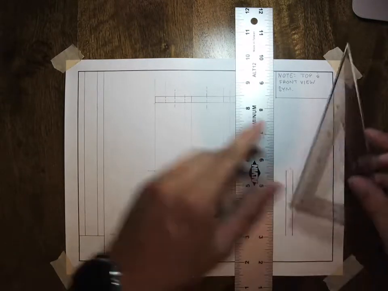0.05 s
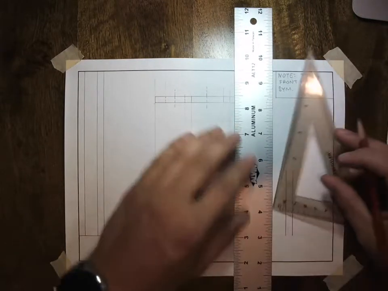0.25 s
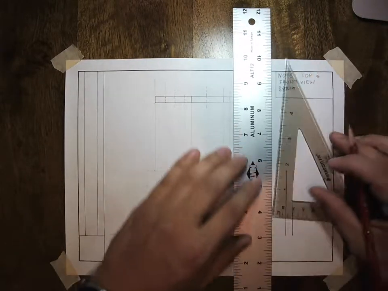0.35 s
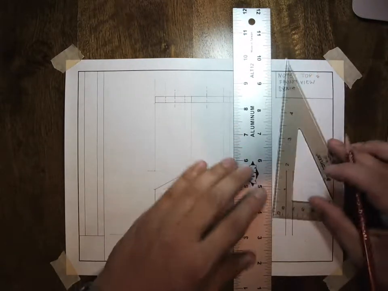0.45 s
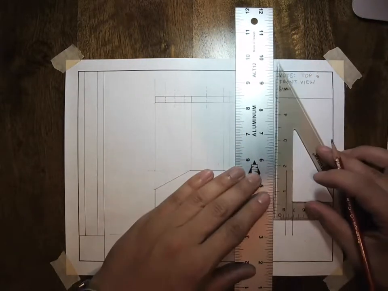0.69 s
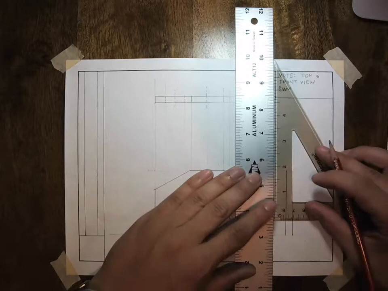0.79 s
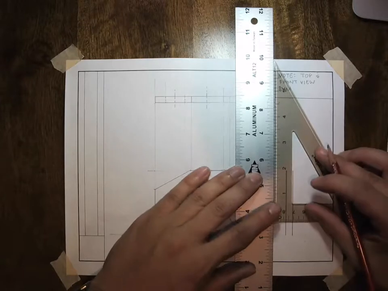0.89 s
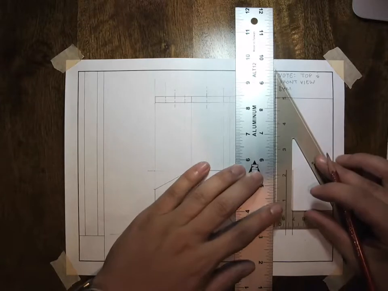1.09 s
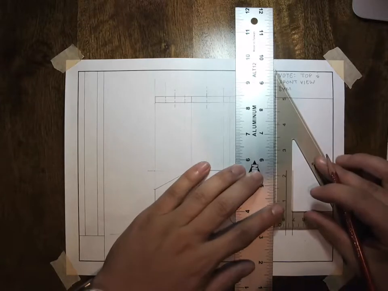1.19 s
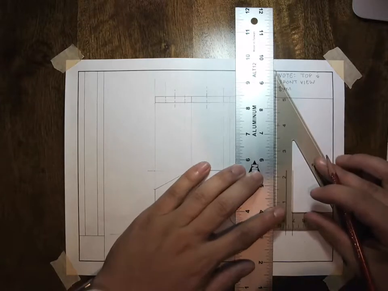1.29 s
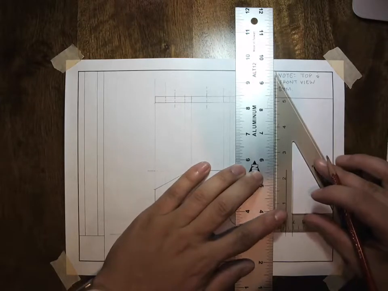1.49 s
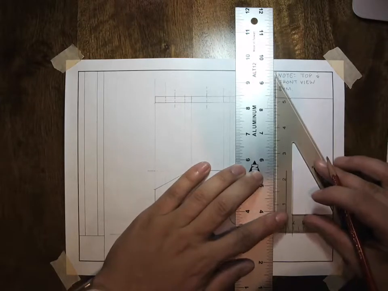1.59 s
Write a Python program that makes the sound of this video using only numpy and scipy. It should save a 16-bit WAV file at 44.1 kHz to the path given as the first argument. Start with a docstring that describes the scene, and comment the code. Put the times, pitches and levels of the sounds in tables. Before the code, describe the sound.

A plastic set square clicks and slaps down on paper, then taps a metal ruler

```python
"""A plastic set square is laid on paper on a wooden desk in a small room, over fan hiss, hum and whine.
Two faint finger squeaks (windowed sines) come first; then a corner ticks, an edge knocks, the square
slaps flat and is pushed against a metal ruler. Each contact is a short push with chatter that rings
decaying sine modes; a near surface echoes it and a diffuse tail of noise bands follows.
The fan, throughout, is flickering noise bands plus thin wavering tones."""
import sys
import numpy as np
from scipy import signal
from scipy.fft import rfft, irfft
from scipy.io import wavfile
from scipy.ndimage import uniform_filter1d

SR = 44100
rng = np.random.default_rng(int(sys.argv[2]) if len(sys.argv) > 2 else 0)


def to_wav(sig):
    """Store sig (one row per channel, or 1-D mono) as 16-bit WAV at the path in sys.argv[1].

    Samples outside -1..1 are clipped; the rate is SR.
    """
    pcm = np.clip(np.atleast_2d(sig), -1, 1) * 32767
    pcm = np.round(pcm).astype(np.int16)
    wavfile.write(sys.argv[1], SR, pcm.T)  # frames by channels


N = 72765
T = np.arange(N) / SR
SHORT_SAMPLES, LONG_SAMPLES = 1024, 16384  # one contact; one ring or room tail


def gain(db):
    """Amplitude factor for a level in dB."""
    return 10 ** (np.asarray(db) / 20)


def curve(rows):
    """Straight-line interpolation of (seconds, value) rows over the scene."""
    seconds, values = np.array(rows).T
    return np.interp(T, seconds, values)


def unit_rms(x):
    """Scale to RMS 1."""
    return x / np.sqrt(np.mean(x ** 2))


def wander(rate_hz):
    """Smooth random wander of RMS 1: white noise averaged twice over 1 / rate_hz."""
    width = int(SR / rate_hz)
    once = uniform_filter1d(rng.standard_normal(N), width)
    return unit_rms(uniform_filter1d(once, width))


def noise_bands(centres_hz, size):
    """Split white noise into overlapping bands, triangular in log frequency."""
    log_hz = np.log(np.maximum(np.arange(size // 2 + 1) * SR / size, 1))
    log_centres = np.log(centres_hz)
    spectrum = rfft(rng.standard_normal(size))
    bands = []
    for one_hot in np.eye(len(centres_hz)):
        weight = np.interp(log_hz, log_centres, one_hot)
        bands.append(irfft(spectrum * weight, size))
    return bands


# Fan hiss spectrum. Each row: frequency in Hz, relative density in dB per Hz.
HISS_SPECTRUM = [(25, -47.5), (60, -29.5), (80, -25), (115, -8.5), (200, -8.5), (330, -10.5), (440, -15.5),
                 (700, -13.5), (950, -11), (1250, -7.5), (1700, -6.5), (2100, -10), (2700, -7.5),
                 (3300, -17), (4500, -20), (6400, -26), (8000, -33), (9600, -43.5), (10500, -61)]


def fan_hiss():
    """Broadband noise of RMS 1 in third-octave-spaced bands, each flickering on its own."""
    flicker_db, flicker_hz = 1.24, 16
    centres_hz = 25 * 2 ** np.arange(0, 8.8, 1 / 3)
    table_hz, table_db = np.array(HISS_SPECTRUM).T
    bands_db = np.interp(np.log(centres_hz), np.log(table_hz), table_db)
    hiss = np.zeros(N)
    for band, db in zip(noise_bands(centres_hz, 2 * N), bands_db):
        hiss += band[:N] * gain(db + flicker_db * wander(flicker_hz))
    return unit_rms(hiss)


def wavering_tones(rows):
    """Thin sine lines whose level and phase wander slowly."""
    waver_db, waver_hz = 2, 9
    phase_cycles, phase_hz = 0.04, 5
    total = np.zeros(N)
    for hz, db in rows:
        level = gain(db + waver_db * wander(waver_hz))
        cycles = hz * T + phase_cycles * wander(phase_hz) + rng.random()
        total += level * np.sin(2 * np.pi * cycles)
    return total


# Low fan lines. Each row: frequency in Hz, peak in dB against the hiss RMS.
HUM_LINES = [(160.5, -13.5), (321, -20), (642, -18)]
# Common level of hiss and hum. Each row: time in seconds, level in dB.
HISS_LEVEL_DB = [(0.0, -64), (0.202, -63), (0.386, -58.5), (0.542, -59.5), (1.01, -63.5), (1.204, -65.5),
                 (1.65, -65)]
# High fan lines. Each row: frequency in Hz, peak in dB against the whine level.
WHINE_LINES = [(2005, -9.5), (2166, -4), (2326, -9.5), (2487, -0.5), (2647, -6.5)]
# Whine level. Each row: time in seconds, level in dB.
WHINE_LEVEL_DB = [(0, -77), (.1, -68.5), (.5, -64), (.8, -67.5), (1.2, -70.5), (1.65, -72)]


def fan():
    """Broad hiss and low hum share one level curve; the high whine follows another."""
    low = (fan_hiss() + wavering_tones(HUM_LINES)) * gain(curve(HISS_LEVEL_DB))
    whine = wavering_tones(WHINE_LINES) * gain(curve(WHINE_LEVEL_DB))
    return low + whine


# Room tail bands. Each row: centre in Hz, decay time T60 in seconds, relative level in dB.
ROOM_BANDS = [(150, 0.27, -9.5), (400, 0.29, -13.5), (990, .22, -13), (2500, 0.19, -12.5),
              (5000, 0.25, -12), (9000, .17, -13.5)]


def room(x):
    """One early echo off a near surface and a diffuse tail that fades band by band."""
    echo_s, echo_db = 0.0113, -18
    grain_db, grain_hz = 4, 600  # unevenness of the scattered reflections
    onset_s = 0.0055
    t = T[:LONG_SAMPLES]
    tail = np.zeros(LONG_SAMPLES)
    centres_hz = np.array(ROOM_BANDS)[:, 0]
    for band, (_, t60_s, db) in zip(noise_bands(centres_hz, LONG_SAMPLES), ROOM_BANDS):
        tail += band * gain(db - 60 * t / t60_s)
    tail *= gain(grain_db * wander(grain_hz)[:LONG_SAMPLES])
    tail *= np.minimum(t / onset_s, 1) / np.sqrt(SR / 100)
    tail[int(echo_s * SR)] += gain(echo_db)
    return x + signal.fftconvolve(x, tail)[:N]


# Squeaks of plastic in the fingers. Each row: start in seconds, frequency in Hz, length in seconds,
# peak in dB.
FINGER_SQUEAKS = [(0.044, 8400, 0.0088, -67.5), (0.064, 7850, 0.011, -57)]


def squeaks():
    """Faint near-pure blips: sines under a sine-squared window."""
    total = np.zeros(N)
    for start_s, hz, length_s, db in FINGER_SQUEAKS:
        window = np.sin(np.pi * np.clip((T - start_s) / length_s, 0, 1)) ** 2
        total += gain(db) * window * np.sin(2 * np.pi * hz * T)
    return total


# Postures of the square, in the column order of the tables below.
POSTURE_NAMES = ["corner", "edge", "slap", "flat", "ruler"]
# Modes of square, ruler and desk. Each row: frequency in Hz, decay time T60 in seconds,
# then relative level in dB for each posture.
MODES = [(134.9, 0.18, -15, -27, -41, -27.5, -27), (225, 0.083, -6, -29, -43.5, -35, -17),
         (288.8, .13, -12.5, -33, -38.5, -23, -37), (366, 0.16, -14, -18, -30, -23, -37.5),
         (416.5, 0.055, -14, -27, -29.5, -30, -17), (496, .08, -33.5, -39.5, -37.5, -27.5, -36),
         (650, 0.078, -32, -25, -26, -25, -37), (815.5, .07, -11.5, -11, -26, -24, -16),
         (1060, .022, -16, -5, -18, -23.5, -18.5), (1307, 0.02, -27, -6.5, -22, -28, -30),
         (1422, .028, -28, -13, -24, -31, -12), (1569, 0.018, -26, -5, -20.5, -36, -3),
         (1701, .018, -16.5, -7, -12, -26.5, -4), (1821, .018, -4.5, -11, -6, -23, -12),
         (1980, .015, -21.5, -9.5, -13, -26.5, -15.5), (2400, 0.014, -21.5, -19.5, -10.5, -22.5, -16),
         (2871, .017, -25.5, -8, -9, -28.5, -25), (3054, 0.019, -11, -28, -5.5, -20, -17),
         (3876, .011, -17, -34, -10, -31, -11), (4240, 0.014, -6.5, -35, -4.5, -26.5, -34),
         (4920, .007, -10, -31.5, 4, -23, -34), (5400, .007, -9, -26, 0, -25, -34),
         (6070, .007, -24, -39.5, 0, -24, -42), (6800, 0.018, -10, -21.5, -8, -23.5, -29),
         (7510, .015, -10.5, -21, -11.5, -29, -15), (8115, 0.017, -5, -34, -10, -19.5, -44),
         (9230, 0.0094, -14, -36, -8, -17, -54)]


def posture_rings():
    """Impulse response of each posture: decaying sine modes that take about a cycle to swing up."""
    rise_cycles = 0.94
    t = T[:LONG_SAMPLES]
    hz, t60_s, *levels_db = np.array(MODES).T[:, :, None]
    rise = 1 - np.exp(-t * hz / rise_cycles)
    modes = np.sin(2 * np.pi * hz * t) * gain(-60 * t / t60_s) * rise
    return [gain(db).ravel() @ modes for db in levels_db]


# Rattle after each contact: one relative level in dB per posture.
RATTLE_DB = [-10.5, -24, -16, -16, -26]


def contact_push(push_ms, posture):
    """A sine-squared push, then sparse random chatter that dies away."""
    chatter_decay_s, chatter_threshold = 0.005, 1.6
    t = T[:SHORT_SAMPLES]
    push = -np.sin(np.pi * np.clip(t * 1000 / push_ms, 0, 1)) ** 2
    size, chance = rng.standard_normal((2, SHORT_SAMPLES))
    chatter = size * (np.abs(chance) > chatter_threshold) * np.exp(-t / chatter_decay_s)
    return push + gain(RATTLE_DB[posture]) * chatter


# Contacts. Each row: start in seconds, strength in dB, length of the push in ms, posture.
CONTACT_EVENTS = [(0.2065, -29, 0.072, "corner"), (0.2097, -38.5, .1, "corner"),
                  (0.2185, -31.5, .1, "corner"), (.238, -40, 1.2, "corner"), (.2486, -15, 0.18, "edge"),
                  (0.253, -17, 0.12, "edge"), (.2601, -23.5, 0.25, "edge"), (.267, -31, 0.23, "edge"),
                  (.3432, -13, 0.084, "slap"), (.345, -20, 0.12, "slap"), (.3538, -8, 0.37, "flat"),
                  (0.3656, -25, .6, "flat"), (0.6215, -20, 0.17, "ruler"), (.625, -19.5, 0.17, "ruler"),
                  (0.6319, -24.5, 0.18, "ruler"), (.635, -26, 0.2, "ruler"), (.6415, -29, .9, "ruler")]
# Bare contact pulse: one level in dB per posture.
PULSE_DB = [-25, -19.5, -6, -0.5, -26]


def taps():
    """Each contact cracks and rings its posture's modes; small objects radiate no deep bass."""
    bass_cut_hz = 146
    out = np.zeros(N + SHORT_SAMPLES + LONG_SAMPLES)
    rings = posture_rings()
    for start_s, strength_db, push_ms, name in CONTACT_EVENTS:
        posture = POSTURE_NAMES.index(name)
        push = contact_push(push_ms, posture)
        push_area = push_ms * SR / 2000 + 1  # in samples, padded by one
        hit = signal.fftconvolve(push, rings[posture]) / push_area
        hit[:SHORT_SAMPLES] += gain(PULSE_DB[posture]) * push
        i = int(start_s * SR)
        out[i:i + len(hit)] += gain(strength_db) * hit
    high_pass = signal.butter(3, bass_cut_hz, "high", fs=SR, output="sos")
    return signal.sosfilt(high_pass, out[:N])


def scene():
    """Taps and squeaks in the room, over the fan; one channel."""
    handling = room(taps() + squeaks())
    return (handling + fan())[None]


def record(dry):
    """The recorder cuts the top and adds a trace of its own white noise."""
    top_hz, self_noise_db = 9800, -104
    low_pass = signal.ellip(10, 0.2, 80, top_hz, fs=SR, output="sos")
    x = signal.sosfilt(low_pass, dry)
    return x + gain(self_noise_db) * rng.standard_normal(x.shape)


dry = scene()
out = record(dry)
to_wav(out)
```